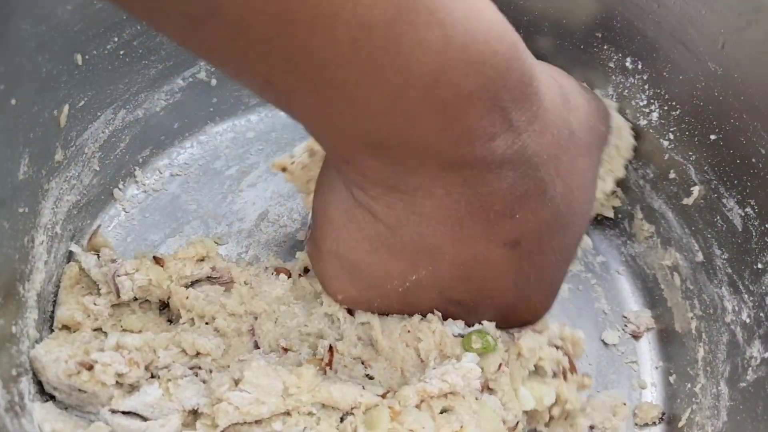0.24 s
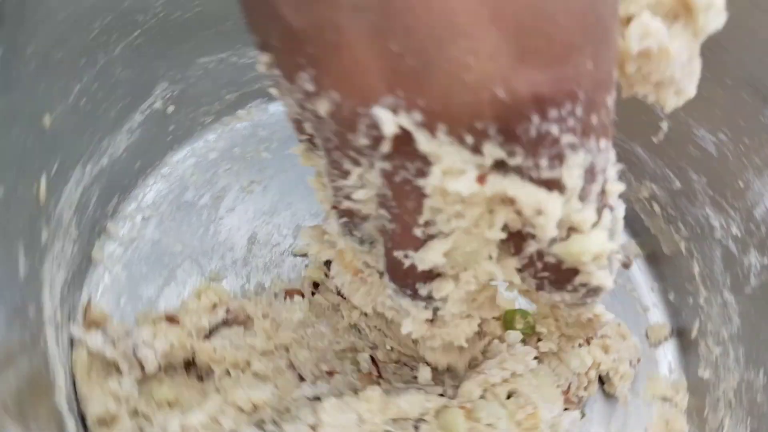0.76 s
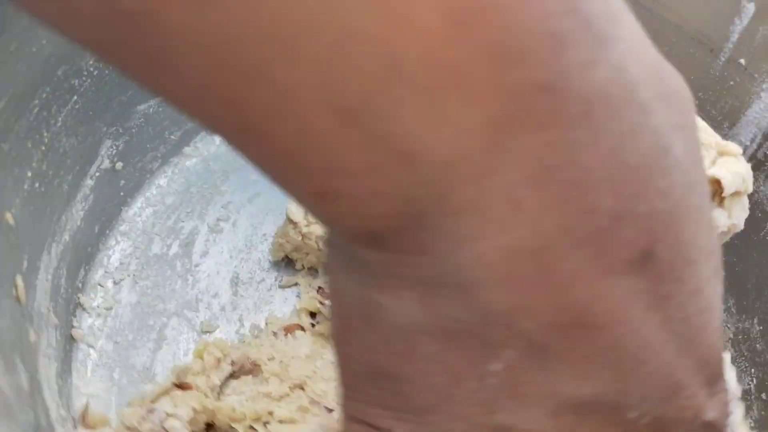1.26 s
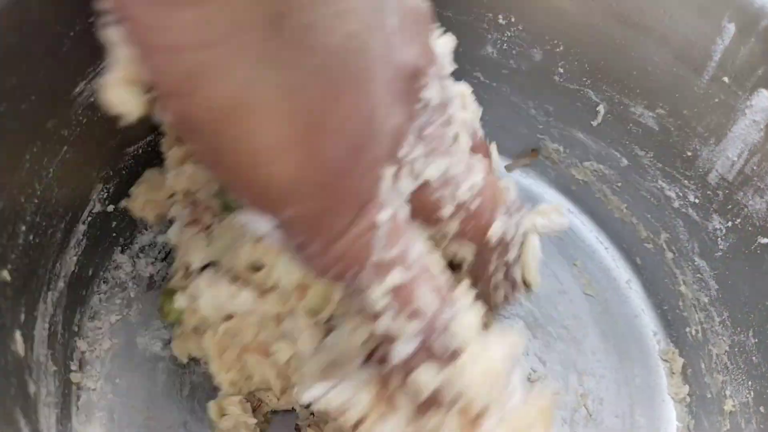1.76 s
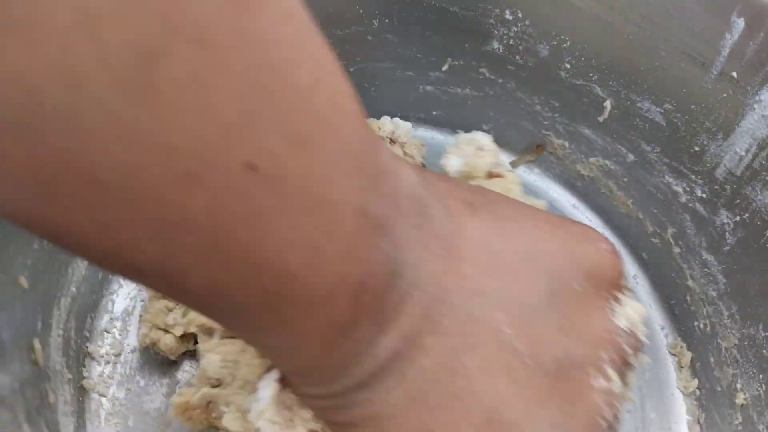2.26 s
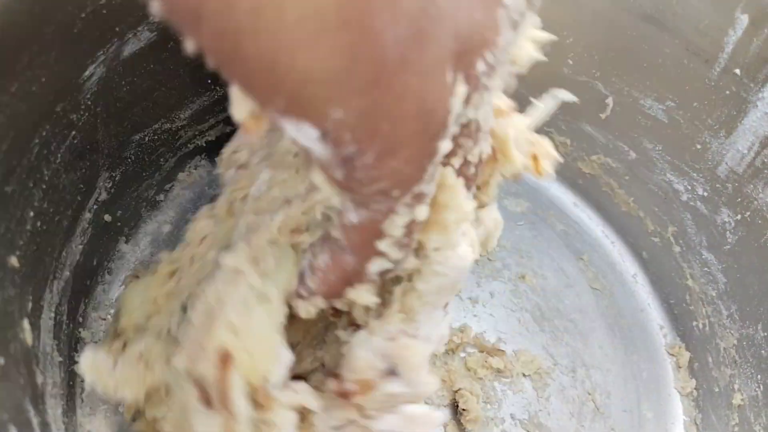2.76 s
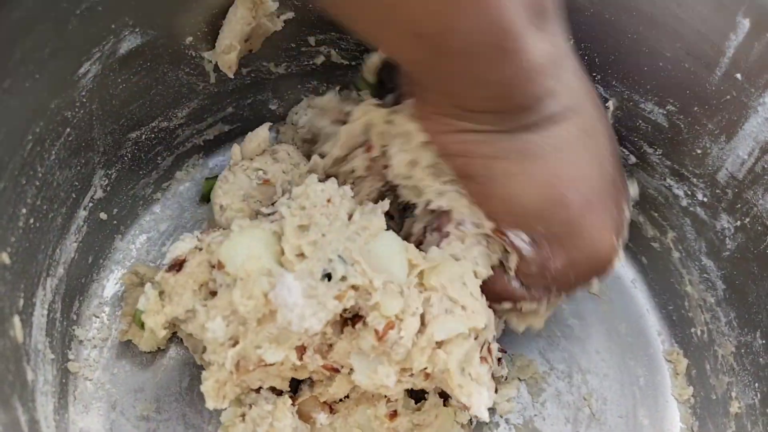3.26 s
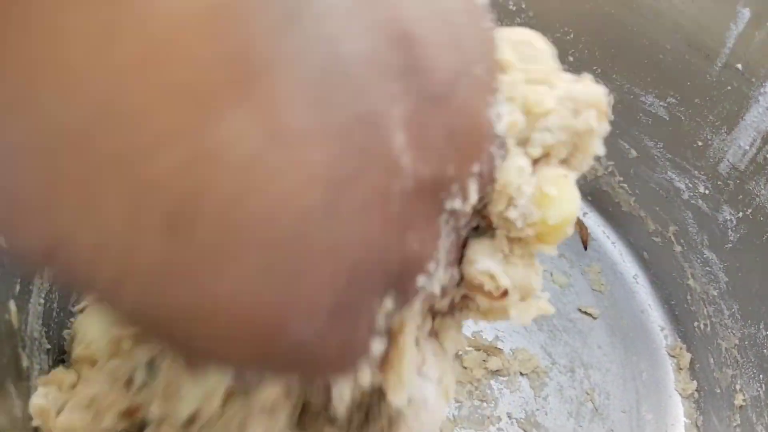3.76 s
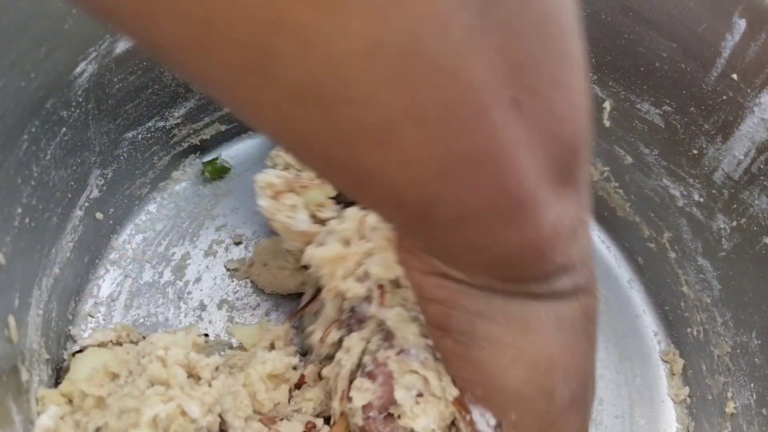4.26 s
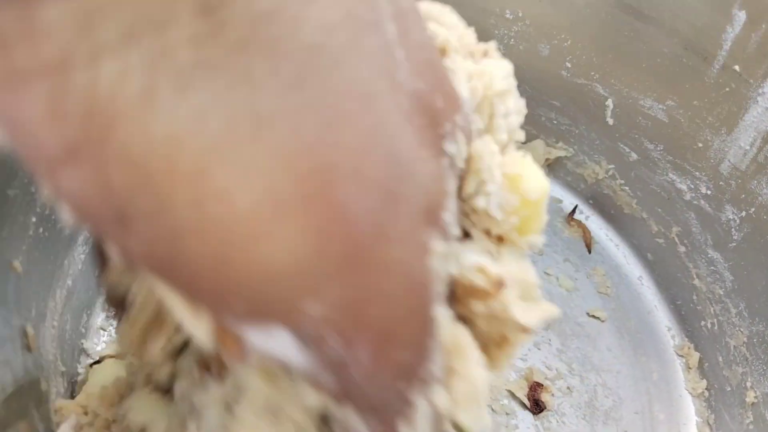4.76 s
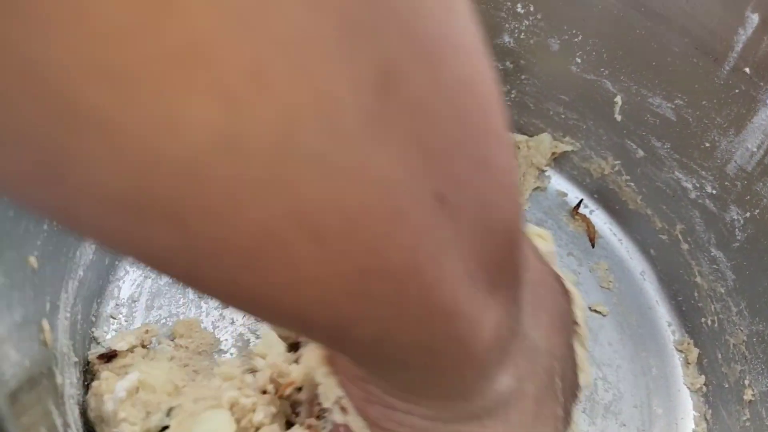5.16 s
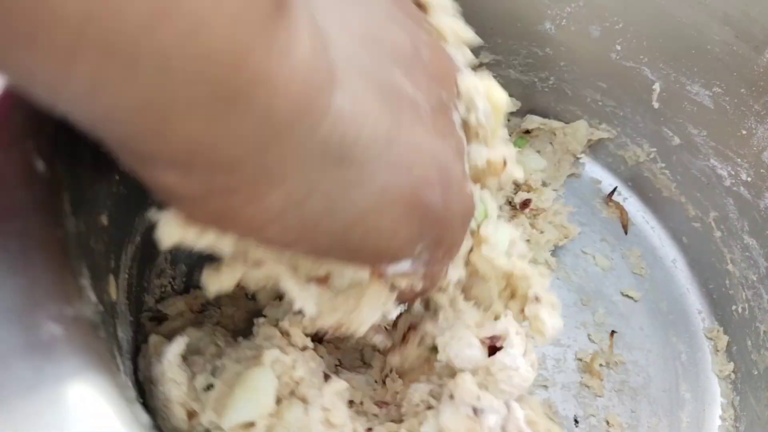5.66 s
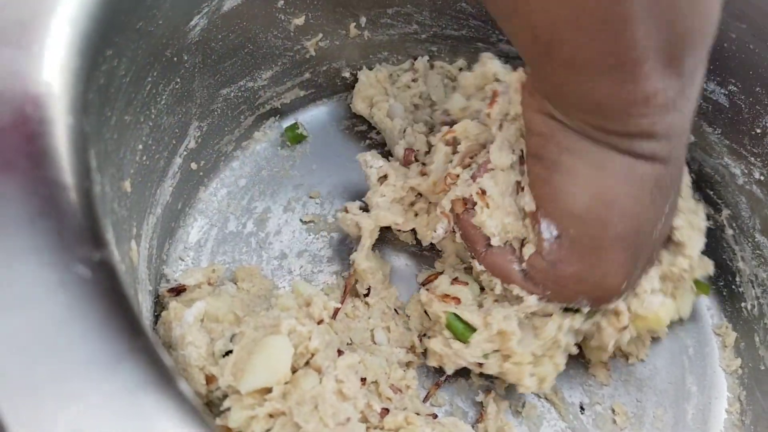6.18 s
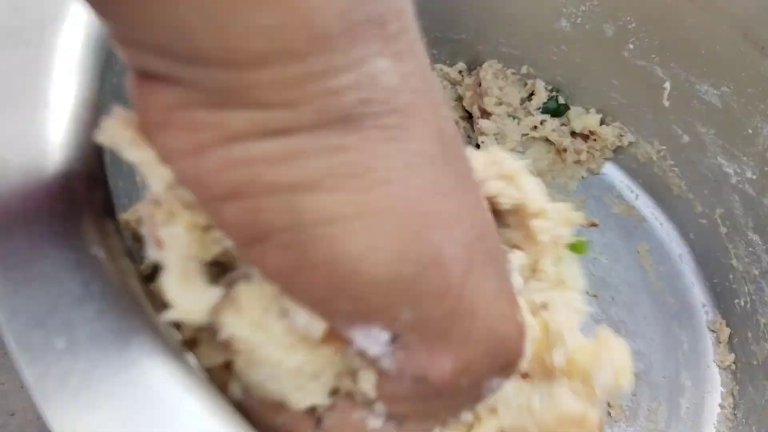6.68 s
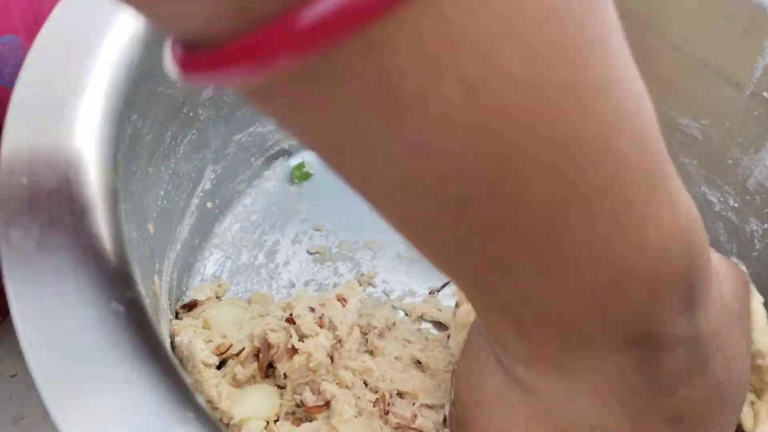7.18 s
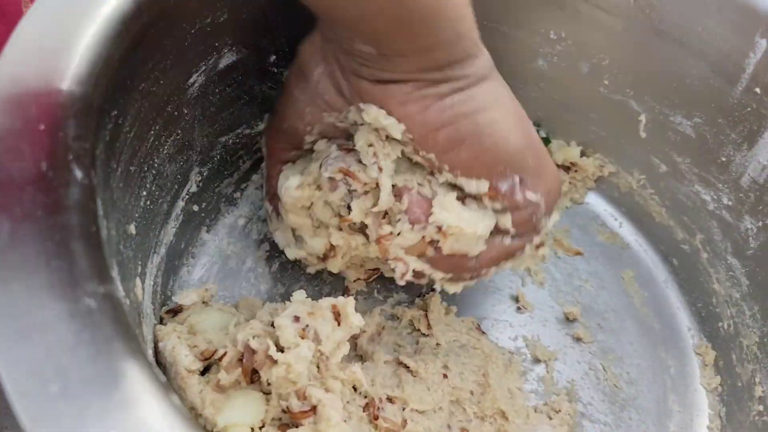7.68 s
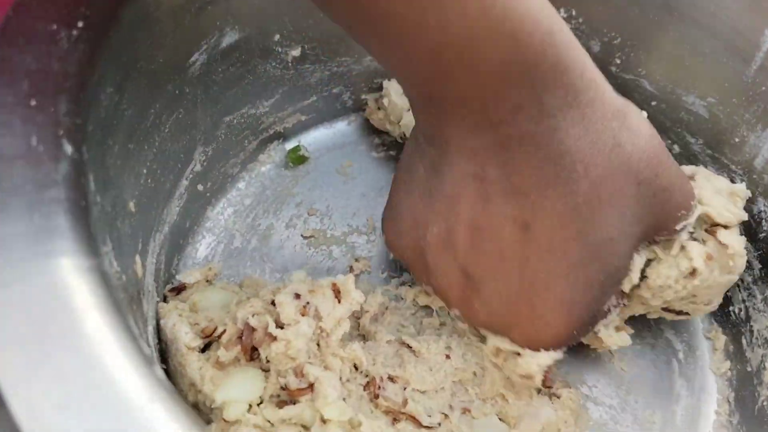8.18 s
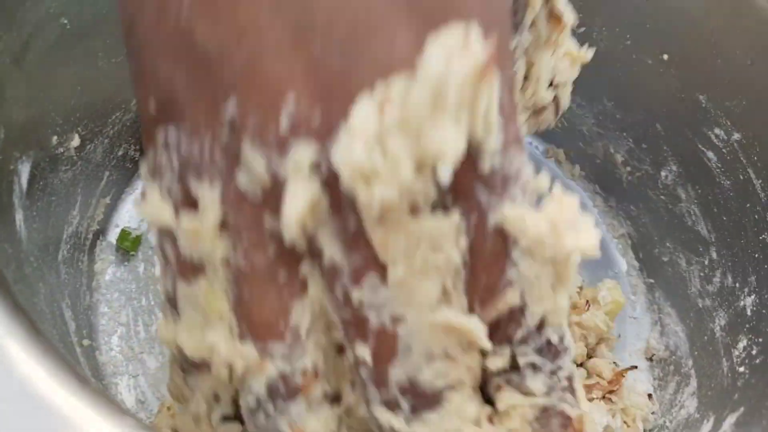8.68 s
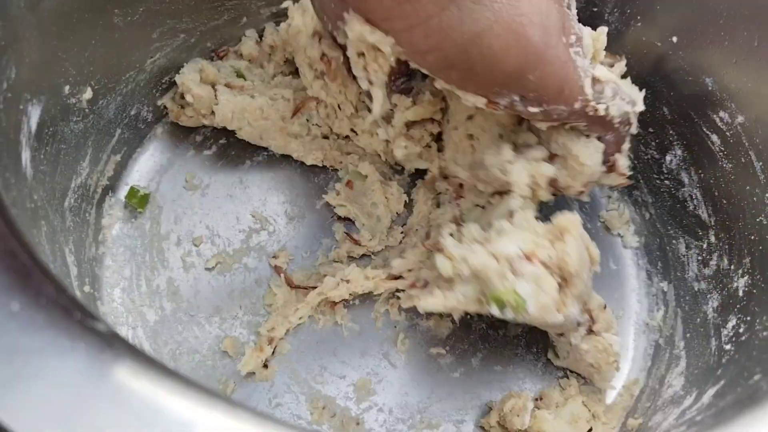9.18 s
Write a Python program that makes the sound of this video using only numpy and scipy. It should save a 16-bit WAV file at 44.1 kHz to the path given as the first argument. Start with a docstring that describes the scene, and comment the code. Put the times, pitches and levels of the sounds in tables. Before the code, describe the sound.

Close-up wet kneading: dough squelches, crackles and peels from metal walls, air pockets snap, and the fist bumps the softly ringing bowl.

```python
"""A hand kneads wet dough in a deep metal bowl, heard from close by: filtered noise grains, swelling with
each squeeze and pull, make the smear and crackle, and drive the resonant modes of the bowl.
Air pockets snap as short bursts of band-passed noise; the fist's thuds are damped sines with a noisy slap.
Thin falling whistles are noise-modulated tones with an echo; a faint hollow groan is a gliding harmonic tone.
Beneath them lie the low rumble of the kitchen and a soft hiss, both of them shaped noise."""
import sys
import numpy as np
from scipy import signal
from scipy.fft import rfft, irfft, next_fast_len
from scipy.io import wavfile

SR = 44100
rng = np.random.default_rng(int(sys.argv[2]) if len(sys.argv) > 2 else 0)


def unload_wav(signal):
    """Save mono or channel-first audio to the path in sys.argv[1] as 16-bit WAV at rate SR, clipped to [-1, 1]."""
    wavfile.write(
        sys.argv[1],
        SR,
        np.round(np.clip(np.atleast_2d(signal).T, -1, 1) * 32767).astype(np.int16),
    )


N = 415863
TIME = np.arange(N) / SR   # s

# Modes of the bowl and the air in it: [f/Hz, strength/dB, time to fall by 60 dB t/s]
BOWL_MODES = [(249, -9, 0.27), (374.7, 3, 0.1), (430, -3, 0.19), (588.2, 10, 0.12), (791, -6, 0.032),
              (955, -40.5, .14), (1105, -21.5, 0.22), (1220, -41, 0.11), (1306.2, -1, 0.028),
              (1725, -17.5, 0.39), (1907.6, -21, .1), (2200, -41.5, .14), (2385, -1, 0.083),
              (3010, -11, 0.065), (3570, -28, .1), (4340, -5, 0.1145), (4770, -10, 0.17),
              (12110, -15, 0.2274)]

# Relative spectrum of the kitchen's rumble: [f/Hz, density/dB per Hz]
RUMBLE_SPECTRUM = [(18, 5), (45, 4), (106, 4), (250, -5), (450, -19), (720, -25), (880, -33.5),
                   (1130, -17.5), (1500, -27.5), (2390, -23), (4100, -22), (7500, -32.5), (10000, -33),
                   (15500, -32)]
RUMBLE_DB = -47.5
# Relative spectrum of the soft hiss under the whistles: [f/Hz, density/dB per Hz]
HISS_SPECTRUM = [(1200, -44), (2200, 5), (3200, 8.5), (4400, 7.5), (6000, -2.5), (8000, -11.5),
                 (12000, -73)]
# Course of the hiss: [t/s, level/dB]
HISS_COURSE = [(0, -63), (.55, -50.5), (1.3, -51.5), (2.9, -59), (3.2, -55.5), (4.3, -54.5), (4.8, -56),
               (5.75, -57), (6.1, -55.5), (7.4, -55.5), (8.1, -102)]

# The clearest falling whistles: [start t/s, length t/s, middle f/Hz, width f/Hz, relative level/dB]
WHISTLE_EVENTS = [(0, 0.17, 3214, 194, -53.5), (0.021, 0.31, 2507, 84, -60), (.075, 0.081, 5070, 110, -50),
                  (0.374, .29, 3980, 402, -53.5), (0.576, 0.18, 4570, 243, -58),
                  (0.665, 0.12, 3324, 120, -45.5), (1.118, 0.16725, 4229, 298, -54.5),
                  (1.338, 0.21, 2420, 148.3, -57), (1.386, 0.08, 3400, 100.4, -48.5),
                  (1.524, .11, 5690, 643, -49), (1.628, 0.079, 3440, 200, -42),
                  (1.796, 0.23, 3246, 286, -48), (2.009, 0.24, 3210, 119, -59),
                  (2.181, 0.22, 4100, 474, -52.5), (2.551, .18, 3200, 98.95, -57),
                  (2.797, 0.072, 2737, 150, -50), (2.929, 0.072, 2284, 38.62, -49),
                  (3.011, .17, 4400, 420, -54.5), (3.203, 0.2, 3540, 35, -63.5),
                  (3.659, 0.25, 4730, 553, -58), (4, 0.05182, 2617, 39.6, -51.5),
                  (4.037, 0.19, 3310, 202.5, -55), (4.086, 0.14, 5720, 597, -51.5),
                  (4.453, 0.18, 3380, 261, -55), (4.709, 0.18, 3760, 222, -58.5),
                  (4.855, 0.072, 2944, 24.9, -43), (4.942, 0.035, 2540, 82, -41.5),
                  (4.951, .15, 5270, 470, -54.5), (4.973, 0.032, 2359, 25, -34),
                  (5.005, .045, 1945, 34.93, -44.5), (5.071, 0.0075, 2667, 30, -31.5),
                  (5.081, .174, 2213, 39.17, -52), (5.606, 0.13, 5300, 650, -52.5),
                  (5.945, 0.061, 4250, 152.1, -57.5), (6.198, 0.15, 5579, 400, -58.5),
                  (6.553, .07, 2230, 80, -57), (6.881, .23, 3640, 133, -59.5),
                  (7.241, 0.1153, 4016, 111, -60.5), (7.778, .22, 5760, 70.7, -70)]
WHISTLE_FALL_OCT, BREATHY_FALL_OCT_PER_HZ = 0.0303, 0.00097   # the wider (breathier), the further it falls
WHISTLE_CORE_DB = -7   # a clear line runs through the breath of each whistle

# Short squeezes: [peak t/s, length t/s, force level/dB, sticky crackle level/dB]
SQUEEZES = [(0.114, 0.22, -53.5, -58), (1.238, 0.087, -31, -38.5), (1.481, 0.075, -28, -54),
            (1.556, 0.16, -37, -53), (1.702, 0.11556, -32.5, -50), (1.82, 0.13624, -42.5, -57.5),
            (1.896, 0.097, -31, -44), (2.009, .12, -50, -44.5), (2.434, .14, -29.5, -53.5),
            (2.487, .05, -45.5, -45), (2.67, .11, -37.5, -48.5), (2.761, 0.13, -43, -66),
            (2.842, 0.074, -38, -64), (3.074, 0.15, -39.5, -48), (3.341, 0.3186, -56, -50.5),
            (3.793, 0.27, -62, -58), (4.597, 0.18, -36.5, -57.5), (5.381, 0.09096, -40, -45),
            (5.508, 0.13, -36.5, -52.5), (5.663, 0.17, -51.5, -54.5), (5.869, 0.063, -33.5, -51),
            (5.997, 0.14, -56.5, -65), (6.149, 0.094, -51.5, -53), (6.295, 0.1267, -51, -51),
            (6.366, 0.0533, -54, -53), (6.575, 0.3257, -56, -62), (6.83, 0.09, -45, -49),
            (7.164, 0.2, -55, -51.5), (7.288, 0.122, -51, -57), (7.516, 0.3593, -54, -62),
            (7.731, 0.11, -54, -57.5), (8.922, 0.097, -35.5, -43.5), (9.008, 0.083, -33, -46),
            (9.161, 0.14, -48.5, -56), (9.242, .13, -33.5, -45), (9.308, .1, -27, -41.5)]
SQUEEZE_RISE_SHARE = 0.41   # of its length a squeeze swells, for the rest it lets go
# Long pulls, dough peeling off the wall:
# [start t/s, attack t/s, hold t/s, release t/s, force level/dB, sticky crackle level/dB]
LONG_PULLS = [(0.71, .28, 0.037, 0.089, -25.5, -38), (8.418, 0.12, 0.13, .16, -28, -33)]
PULL_CURVE, PULL_TEAR_DB = 1.28, 3.5   # a pull builds as this power of time, and tears more than a squeeze
PRESS_DB, RUB_DB, TEAR_DB = -2, -1.5, 1.5   # relative to force; for tearing, to the mean of force and sticking
# The hand presses first, then slides, and the dough tears last:
# powers of the swell [pressing, rubbing, tearing, sticking]
STROKE_POWERS = [.75, .95, 1.25, 1.3]
SURGE_DB, SURGES_PER_S = 1.7, 45   # the dough gives way unevenly
# Relative spectra of pressed, rubbed, torn wet and sticky dough: [f/Hz, density/dB per Hz]
PRESS_SPECTRUM = [(90, -22), (190, -4), (260, -1.5), (360, 3.5), (480, -2.5), (585, 2), (700, -12),
                  (1000, -12.5)]
RUB_SPECTRUM = [(600, -30), (790, 1.5), (900, -5), (1130, 7), (1300, 0.5), (1500, -15), (1850, -1.5),
                (2450, -14.5), (4000, -42)]
WET_SPECTRUM = [(1400, -20), (1800, -0.5), (2050, -5), (2450, 0.5), (3300, -3), (4400, -6), (5600, -7.5),
                (7200, -13), (10000, -16.5)]
STICKY_SPECTRUM = [(2500, -25), (4500, 3.5), (6500, -6), (7600, -11.5), (9000, 2), (12500, -1), (15500, -1),
                   (17000, -26)]

TICK_SCATTER_S = .09   # scale of the spread of ticks before and after a squeeze
TICK_DB, TICK_SPREAD_DB = -59, 11   # the smallest tick; how much louder the largest is

# The larger air pockets snapping, with a few sharp knocks near 8 s played the same way: [t/s, level/dB, pocket
# f/Hz, low share level/dB, treble share level/dB]
SNAP_EVENTS = [(0.174, -34.5, 1630, -18, -11.5), (0.322, -53, 2200, 10.5, -37),
               (0.533, -55, 5500, -19.5, 4.5), (0.767, -32.5, 1970, -7, -4.5), (1.232, -22.5, 4560, -7, -4),
               (1.701, -21, 2330, -12, -7.5), (1.797, -37, 5455, 1.5, -1), (1.984, -39, 2300, -10, 5),
               (2.029, -40, 3320, -4, -1), (2.198, -43.5, 2241, -1, -14), (2.627, -25, 2576, -8.5, -14),
               (3.077, -24.5, 2170, -8, -4.5), (3.114, -34.5, 2080, -7, -2), (3.3025, -19, 2252, -18, -14),
               (3.439, -33.5, 1980, 1.5, -10), (3.574, -28.5, 2530, -12, -18), (3.998, -57.5, 5500, -15, 8),
               (4.215, -31.5, 2540, -6.5, -12.5), (4.623, -30.5, 2407, -10, -15.5),
               (4.649, -32, 2414, -10, -14.5), (5.072, -36, 2510, 7, -9.5), (5.414, -38.5, 4436, 7.5, -1),
               (5.4784, -16.5, 2940, -2.5, -9.5), (5.511, -35, 2977, -5, -7.5),
               (5.85, -21, 2250, -7.5, -7.5), (5.92, -35, 2570, -3.5, -12), (6.186, -37, 2460, -0.5, 1.5),
               (6.265, -43, 5525, 9.5, 5.5), (6.291, -33.5, 2640, 5.5, -6.5), (6.337, -51, 1920, 22, 3),
               (6.37, -37, 2117, 11, 2), (6.3921, -30, 4570, 5, 2), (6.55, -30.5, 2423, -24, -26),
               (6.823, -40, 2180, -2.5, 0.5), (7.01, -42.5, 2430, -12, -1.5),
               (7.468, -34.5, 2230, -33, -54), (7.677, -48.5, 4743, -41, -6), (7.822, -33.5, 4200, 1, -17),
               (7.979, -50.5, 1614, 15, -13.5), (8.065, -47.5, 1710, 8.5, -17),
               (8.199, -53.5, 4500, 1, 4.5), (8.937, -30, 2050, 4, -1.5), (8.989, -19, 2110, -4, -5),
               (9.026, -29, 2100, 6.5, -3.5), (9.067, -36.5, 1923, 0.5, -10), (9.145, -35.5, 1960, 4.5, 3),
               (9.234, -32, 2260, 7, 7.5), (9.313, -35.5, 1909, -8, 4.5)]
# Tiny pockets and those that burst hardest are empty soonest; above -25.5 dB the last row holds:
# [level/dB, decay t/s]
SNAP_DECAYS = [(-51, 0.0018), (-35.5, 0.005), (0, 0.0027), (2, 0.0059), (-25.5, 0.0029)]

# Fist and dough landing on the bottom:
# [t/s, level/dB, boom f/Hz, relative bowl ring level/dB, left-right difference/dB]
THUD_EVENTS = [(0.163, -21, 362, -12, -13), (0.173, -25, 300, -45, -8), (0.815, -23.5, 177.8, -11, -12),
               (0.849, -30.5, 210, -20, -12), (1.234, -33.5, 343, -23, -14), (1.288, -31, 161.5, -23, -7),
               (1.703, -46.5, 443, 6.5, -21.5), (2.053, -36.5, 238.9, -8.5, -8),
               (2.433, -29.5, 366, -16, -8), (2.67, -36, 218, -10, -8), (2.764, -35.5, 364, -25, -4),
               (2.834, -33, 246.6, -13, -4), (3.438, -25, 380, -10.5, -10), (3.575, -55, 556, 1.5, -7),
               (4.113, -27.5, 319, -17, 7), (4.433, -31, 376, -17, 1), (4.62, -31.5, 452, -9, -32.5),
               (5.021, -38.5, 395, -18.5, -3), (5.072, -29, 150, -7, -35), (5.332, -30, 354.9, -15.5, -4),
               (5.851, -35, 262, -27.5, -3), (6.292, -27, 186, -14.5, -4.5), (6.39, -38.5, 380, -35, -10),
               (6.475, -43, 152.1, -7.5, -12.5), (6.714, -44, 180, -21, 2), (6.768, -45.5, 175, -13.5, 3),
               (7.059, -39, 298, -16, -1), (7.45, -38.5, 124.5, -13, -25.5), (7.706, -45, 348.7, -33, 9),
               (7.834, -36.5, 355, -20, 1), (7.977, -32, 322.6, -25, 14), (8.022, -31, 205, -18, -0.5),
               (8.29, -32, 154, -20, 24), (8.854, -40, 382.8, -10.5, -8), (8.937, -33.5, 510, -9.5, 10)]
SLAP_DB, SLAP_FOLLOWS = -42, 0.97   # skin slap of an average blow; share of the blow's extra dB it takes on

# A faint hollow tone that holds its pitch, then sinks
GROAN_START_S, GROAN_SINKS_S, GROAN_END_S, GROAN_EDGE_S = 1.03, 1.1, 1.68, 0.025
GROAN_HZ, GROAN_SAG_HZ_PER_S = 402.44, 330
GROAN_DB, GROAN_FADE_DB_PER_S = -41.5, 1
GROAN_OVERTONE_DB, GROAN_OVERTONE_LOSS_DB_PER_S = -6, 52

LOW_CUT_HZ, TOP_CUT_HZ = 35, 15850


def from_db(db):
    """Level is logarithmic: 20 dB is a factor of ten in amplitude."""
    return 10 ** (np.asarray(db) / 20)


def rms_one(x, span_s=None):
    """Normalization: the rms, overall or over the first span, becomes 1."""
    head = x if span_s is None else x[..., :int(span_s * SR)]
    return x / np.sqrt(np.mean(head ** 2) + 1e-20)


def in_time(rows):
    """Linear interpolation: the columns of a curve, sample by sample."""
    s, *columns = np.transpose(rows)
    return [np.interp(TIME, s, c) for c in columns]


def add(out, s, x):
    """Superposition: a short sound is summed in at time s."""
    at = max(int(s * SR), 0)
    out[:, at:at + x.shape[1]] += x[:, :max(N - at, 0)]


def pan(left_db):
    """Constant-power panning: left and right gains that differ by left_db."""
    return rms_one(from_db([[left_db / 2], [-left_db / 2]]))


def band(x, low_hz, high_hz, order=2):
    """Causal band-pass filtering."""
    edges = [low_hz, min(high_hz, .48 * SR)]
    return signal.sosfilt(signal.butter(order, edges, "band", fs=SR, output="sos"), x)


def colour(x, spectrum):
    """Spectral shaping: a steady texture is weighted along log frequency, then set to rms 1."""
    hz, db = np.transpose(spectrum)
    size = next_fast_len(N)
    grid = np.maximum(np.arange(size // 2 + 1) * SR / size, 1)
    weight = from_db(np.interp(np.log(grid), np.log(hz), db, -90, -90))
    return rms_one(irfft(rfft(x, size) * weight, size)[:, :N])


def ports(three, alike, lag_s):
    """Partial coherence: a shared signal, late on the left, plus an independent one for each channel."""
    alike = np.clip(alike, 0, 1)
    at = np.arange(three.shape[1])
    late = np.interp(at - lag_s * SR, at, three[0], left=0)
    shared = np.array([late, three[0]])
    return np.sqrt(alike) * shared + np.sqrt(1 - alike) * three[1:]


def drift(rate, size=N):
    """Slow random fluctuation with spread about 1: straight lines between chance values, rate per second."""
    at = np.arange(size) * rate / SR
    return 1.2 * np.interp(at, np.arange(size // 8), rng.standard_normal(size // 8))


def bowl(x):
    """Modal resonance: each mode of the bowl rings on, decaying exponentially, after its excitation."""
    out = 0
    for hz, db, t60 in BOWL_MODES:
        radius = from_db(-60 / (t60 * SR))
        angle = 2 * np.pi * hz / SR
        feedback = [1, -2 * radius * np.cos(angle), radius * radius]
        out = out + from_db(db) * signal.lfilter([0, np.sin(angle)], feedback, x + 1e-18)
    return out


def burst(t, decay_s, tail_db, tail_s, alike, lag_s):
    """Impulsive noise with a second decay: a pulse, then its scattering between the close metal walls."""
    fade = np.exp(-t / decay_s) + from_db(tail_db) * np.exp(-t / tail_s)
    return ports(rng.standard_normal((3, len(t))) * fade, alike, lag_s)


def kitchen():
    """Stationary noise: a low rumble, and a soft hiss whose level changes slowly."""
    rumble = colour(ports(rng.standard_normal((3, N)), alike=0.47, lag_s=0), RUMBLE_SPECTRUM)
    rumble = rumble * from_db(RUMBLE_DB + 0.5 * drift(3.47))
    hiss_db = in_time(HISS_COURSE)[0]
    hiss = colour(ports(rng.standard_normal((3, N)), alike=0.053, lag_s=0), HISS_SPECTRUM)
    hiss = hiss * from_db(hiss_db + 1.4 * drift(19))
    return rumble * pan(0.17) + hiss * pan(6.5)


def whistles():
    """Narrow-band modulation: noise flutters about a falling tone, and a decaying echo prolongs it."""
    out, t = np.zeros((2, N)), np.arange(SR // 2) / SR
    for s, length_s, middle_hz, width_hz, db in WHISTLE_EVENTS:
        fall_oct = WHISTLE_FALL_OCT + BREATHY_FALL_OCT_PER_HZ * width_hz
        along = np.clip(t / length_s, 0, 1)
        hz = middle_hz * 2 ** (fall_oct * (.5 - along)) + .5 * width_hz * drift(50, len(t))
        phase = 2 * np.pi * np.cumsum(hz) / SR
        swell = np.clip(t / 0.018, 0, 1) * np.exp(-np.maximum(t - length_s, 0) / 0.011)
        # complex low-passed noise spreads the tone to its width; the filter's settling half is dropped
        slow = signal.butter(2, width_hz * 1.1812, fs=SR, output="sos")
        complex_noise = rng.standard_normal((3, len(t) * 2, 2)) @ [1, 1j]
        flutter = signal.sosfilt(slow, complex_noise)[:, len(t):]
        breath = ports((flutter * np.exp(1j * phase)).real, alike=.65, lag_s=0)
        breath = breath * from_db(3.5 * drift(110, len(t)))
        core = from_db(WHISTLE_CORE_DB) * np.cos(phase) * from_db(3.6 * drift(59, len(t)))
        tone = rms_one(rms_one(breath, length_s) + core, length_s)
        add(out, s, from_db(db + 2.0) * tone * swell)
    t = np.arange(SR) / SR
    tail = rng.standard_normal((2, SR)) * from_db(-60 * t / 0.31)   # falls by 60 dB in 0.31 s
    echo = signal.fftconvolve(out, rms_one(tail) / np.sqrt(SR), axes=1)[:, :N]
    return (out + from_db(4.5) * echo) * pan(7.13)


def effort():
    """Common driving force: squeezes and pulls set the gains of pressing, rubbing, tearing and sticking."""
    gains = np.zeros((4, N))
    rise = SQUEEZE_RISE_SHARE
    strokes = [(peak - rise * length_s, rise * length_s, 0, (1 - rise) * length_s, force_db, sticky_db, 1, 0)
               for peak, length_s, force_db, sticky_db in SQUEEZES]
    strokes += [(*pull, PULL_CURVE, PULL_TEAR_DB) for pull in LONG_PULLS]
    for s, attack_s, hold_s, release_s, force_db, sticky_db, power, tear_db in strokes:
        corners = np.cumsum([0, attack_s, hold_s, release_s])
        swell = np.interp(np.arange(0, corners[-1], 1 / SR), corners, [0, 1, 1, 0]) ** power
        wet_db = (force_db + sticky_db) / 2 + TEAR_DB + tear_db
        peaks = from_db([force_db + PRESS_DB, force_db + RUB_DB, wet_db, sticky_db])
        add(gains, s, np.array([peak * swell ** late for peak, late in zip(peaks, STROKE_POWERS)]))
    return gains * from_db(SURGE_DB * drift(SURGES_PER_S))


def grains(per_s, spread_db, clump_db, lag_s):
    """Random impulse train: countless tiny threads of dough let go, in clumps and of uneven size."""
    born = rng.random((3, N)) < per_s / SR
    sizes = from_db(spread_db * np.minimum(rng.exponential(1, (3, N)), 4))
    signs = rng.choice([-1, 1], (3, N))
    return ports(born * sizes * signs, alike=0.47, lag_s=lag_s) * from_db(clump_db * drift(110))


def smear():
    """Stick-slip friction: pressure stirs the bowl's air, sliding rubs the wall, the wet surface crackles."""
    press_gain, rub_gain, wet_gain, sticky_gain = effort()
    slips = grains(per_s=1800, spread_db=3.5, clump_db=2, lag_s=.00026)
    scrapes = grains(per_s=2500, spread_db=3.5, clump_db=2, lag_s=.00019)
    threads = grains(per_s=3500, spread_db=4, clump_db=2, lag_s=.00003)
    crackles = grains(per_s=3200, spread_db=5, clump_db=2.2, lag_s=.00014)
    press = press_gain * colour(slips, PRESS_SPECTRUM) * from_db(-3.0) * pan(-6.0)
    rub = rub_gain * colour(scrapes, RUB_SPECTRUM) * pan(-1.2)
    wet = wet_gain * colour(threads, WET_SPECTRUM) * pan(-0.1783)
    sticky = sticky_gain * colour(crackles, STICKY_SPECTRUM) * from_db(2.0) * pan(-16.5)
    ring = from_db(-41.5) * bowl(rub + wet + 0.065 * press)
    return press + rub + wet + sticky + ring


def ticks():
    """Sparse impulses: around the squeezes, crumbs and threads tick faintly, each of its own pitch and size."""
    out, t = np.zeros((2, N)), np.arange(SR // 30) / SR
    for which, when, pitch, size in rng.random((130, 4)):
        squeeze_s = SQUEEZES[int(which * len(SQUEEZES))][0]
        s = squeeze_s + TICK_SCATTER_S * np.log(when / (1 - when))   # logistic spread
        hz = 1000 * 7 ** pitch
        pulse = burst(t, 0.0024, tail_db=-27, tail_s=0.003, alike=0.14, lag_s=0)
        tick = rms_one(band(pulse, hz * .87, hz * 1.15, order=1), .01)
        add(out, s, from_db(TICK_DB + TICK_SPREAD_DB * size ** 2) * tick)
    return out


def snaps():
    """Cavity resonance: dough stretches, then a pocket bursts and rings a few cycles at its size's pitch."""
    out, t = np.zeros((2, N)), np.arange(SR // 10) / SR
    span = .012   # s, over which levels are set
    for s, db, hz, low_db, treble_db in SNAP_EVENTS:
        decay_s = np.interp(db, *np.transpose(SNAP_DECAYS))
        crack = burst(t, decay_s, tail_db=-25, tail_s=0.026, alike=0.54, lag_s=.00002)
        knock = burst(t, decay_s * 1.6, tail_db=-44, tail_s=0.0059, alike=0.64, lag_s=0.00032)
        pocket = rms_one(band(crack, hz * 0.92, hz * 1.152), span)
        wall = rms_one(band(crack, 3700, 4660), span)   # the wall answers with a clink
        spit = rms_one(band(crack, 2022.9, 4360, order=3), span)
        body = rms_one(.3 * spit + 0.31433 * pocket + 0.23 * wall, span)
        low = from_db(low_db) * rms_one(band(knock, 1000, 1353), span)
        treble = from_db(treble_db) * rms_one(band(crack, 6700, 14500), span)
        add(out, s, from_db(db) * (body * pan(0.00089) + low + treble * pan(-11.0)))
        # noise that grows up to the moment of bursting
        stretch = rms_one(band(rng.standard_normal((2, len(t))), 1700, 7333)) * np.exp(-t[::-1] / 0.0095)
        add(out, s - len(t) / SR, from_db(db - 19.0) * stretch)
    return out + from_db(-46.5) * bowl(out)


def thuds():
    """Damped impact: the dough-loaded bottom booms briefly, skin slaps, and the bowl rings on."""
    out, t = np.zeros((2, N)), np.arange(SR // 4) / SR
    span = .03   # s, over which levels are set
    average_db = np.mean([row[1] for row in THUD_EVENTS])
    for s, db, hz, ring_db, left_db in THUD_EVENTS:
        slap_db = SLAP_DB + SLAP_FOLLOWS * (db - average_db)
        boom = np.sin(2 * np.pi * hz * t) * np.exp(-t / 0.0055) * (1 - np.exp(-t / 0.002376))
        boom = band(boom, hz * 0.41, hz * 5, order=1)   # the small bottom radiates little bass
        contact = burst(t, 0.0044, tail_db=-17.5, tail_s=0.020435, alike=0.33, lag_s=0.00034)
        low = rms_one(rms_one(boom, span) + 0.93 * rms_one(band(contact, 159, 375), span), span)
        slap = rms_one(band(contact, 966, 1200) + 0.28 * band(contact, 1620, 2174.8), span)
        push = t * np.exp(-t / 0.00019)
        ring = rms_one(bowl(ports(np.array([push, push, push]), alike=0.99, lag_s=0.00045)), span)
        blow = low * pan(left_db) + from_db(ring_db + 9.0) * ring * pan(-1.2)
        add(out, s, from_db(db) * blow + from_db(slap_db) * slap)
    return out


def groan():
    """Harmonic series: a low, slightly unsteady tone slides down and loses its overtones."""
    age = np.clip(TIME, GROAN_START_S, GROAN_END_S) - GROAN_START_S
    hz = GROAN_HZ - GROAN_SAG_HZ_PER_S * np.maximum(age + GROAN_START_S - GROAN_SINKS_S, 0)
    sounding = np.clip(np.minimum(TIME - GROAN_START_S, GROAN_END_S - TIME) / GROAN_EDGE_S, 0, 1)
    phase = 2 * np.pi * np.cumsum(hz * (1 + .03 * drift(70))) / SR
    overtones = from_db(GROAN_OVERTONE_DB - GROAN_OVERTONE_LOSS_DB_PER_S * age)
    tone = np.sin(phase) + overtones * (np.sin(2 * phase) + .5 * np.sin(3 * phase))
    level = from_db(GROAN_DB - GROAN_FADE_DB_PER_S * age + 2 * drift(27.5))
    return sounding * level * tone * pan(-6.0)


def scene():
    """Linear superposition of everything that sounds in and around the bowl."""
    return kitchen() + whistles() + smear() + ticks() + snaps() + thuds() + groan()


def record(dry):
    """Band limitation: the microphone loses the deepest rumble, full scale clips peaks, the top is cut."""
    heard = signal.sosfilt(signal.butter(2, LOW_CUT_HZ, "high", fs=SR, output="sos"), dry)
    top_cut = signal.ellip(10, .2, 70, TOP_CUT_HZ, fs=SR, output="sos")
    return signal.sosfilt(top_cut, np.clip(heard, -1, 1))


dry = scene()
out = record(dry)
unload_wav(out)
```